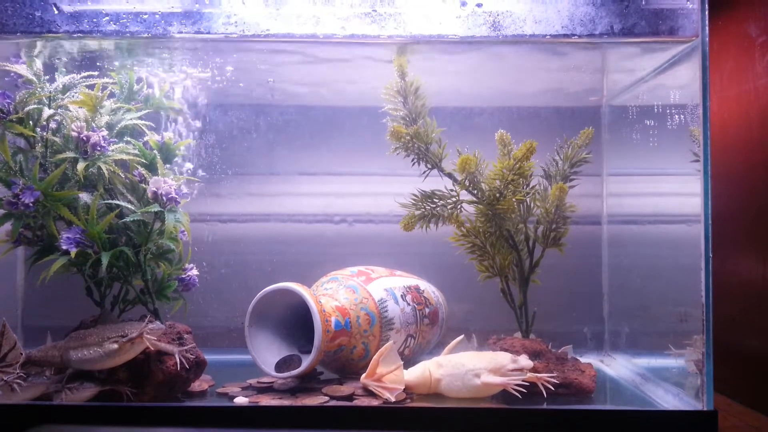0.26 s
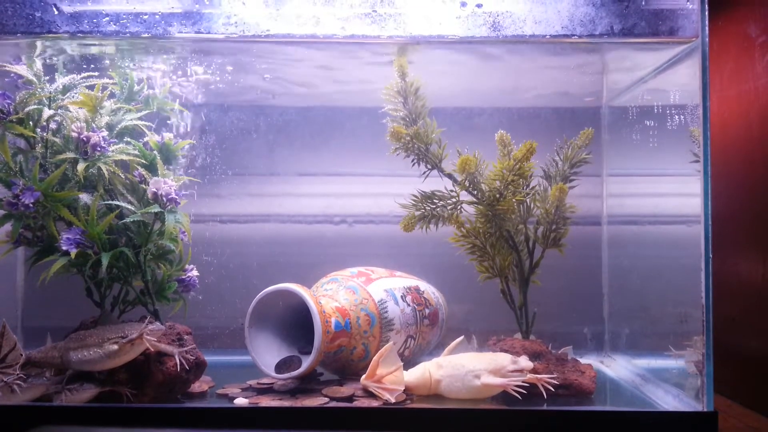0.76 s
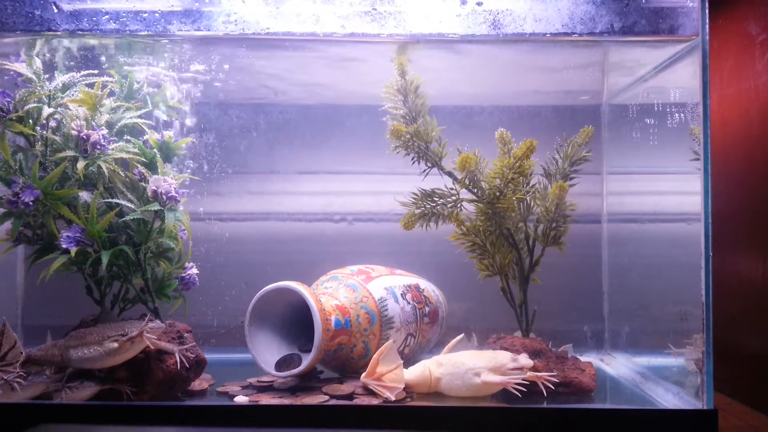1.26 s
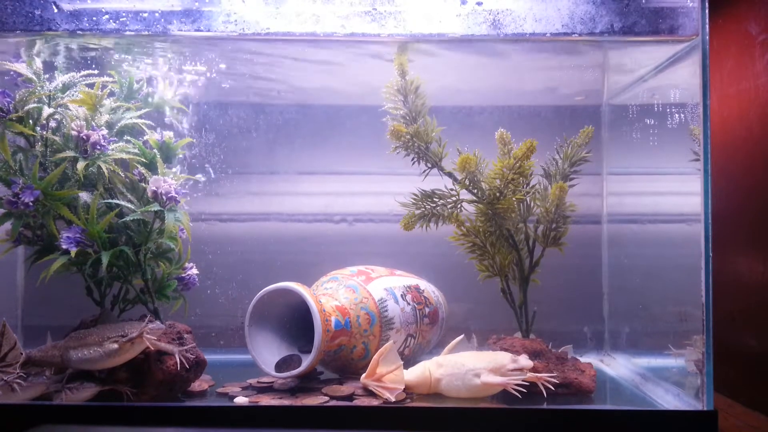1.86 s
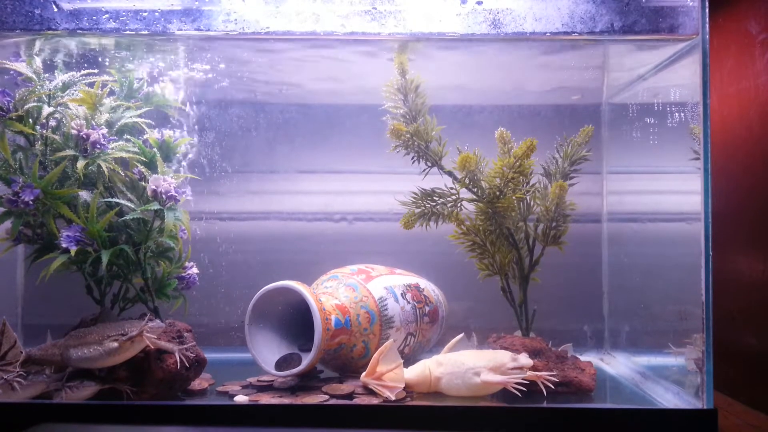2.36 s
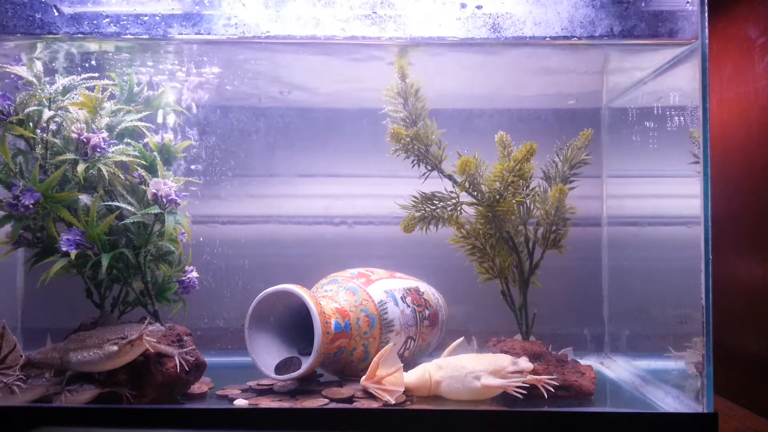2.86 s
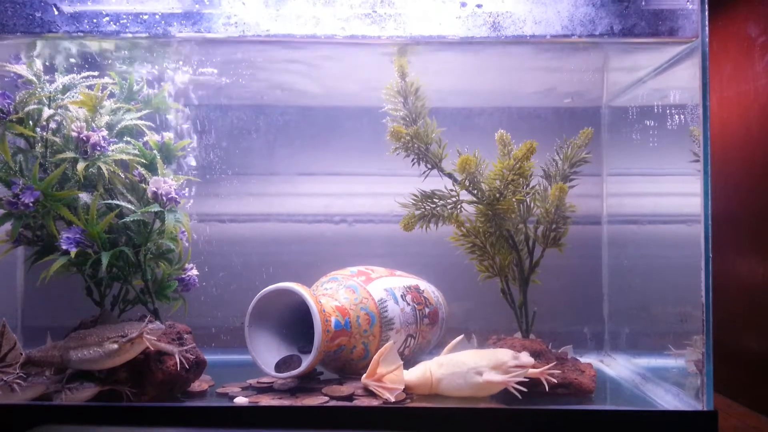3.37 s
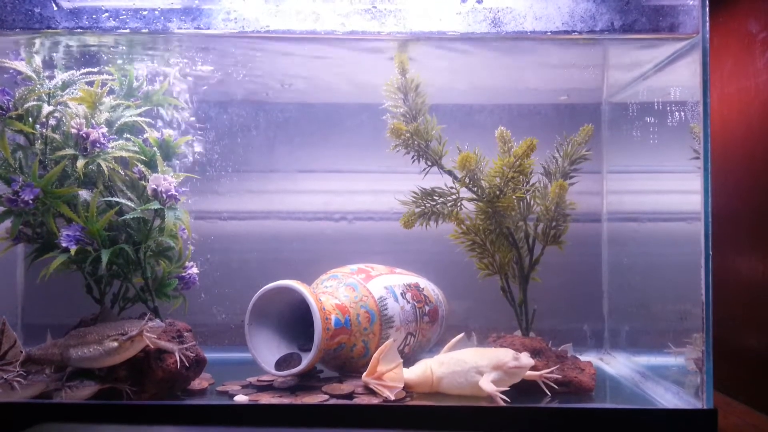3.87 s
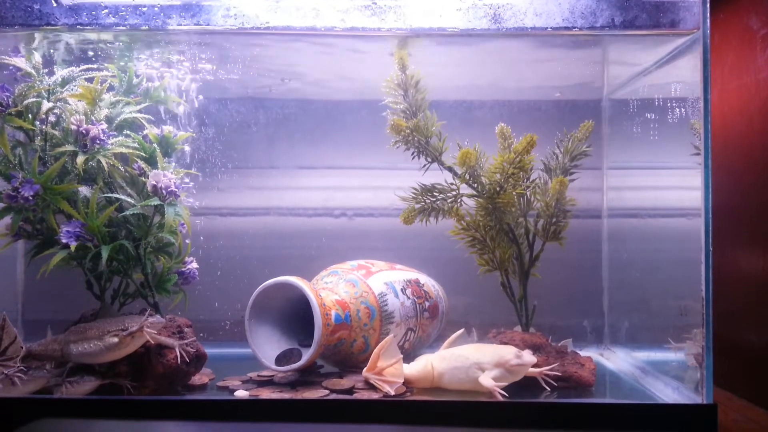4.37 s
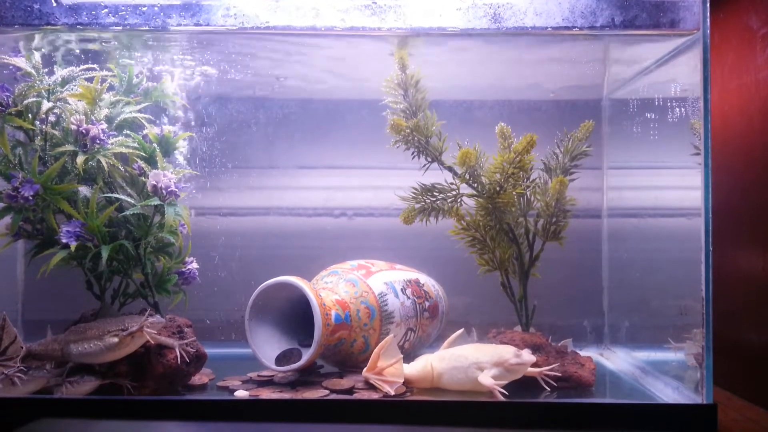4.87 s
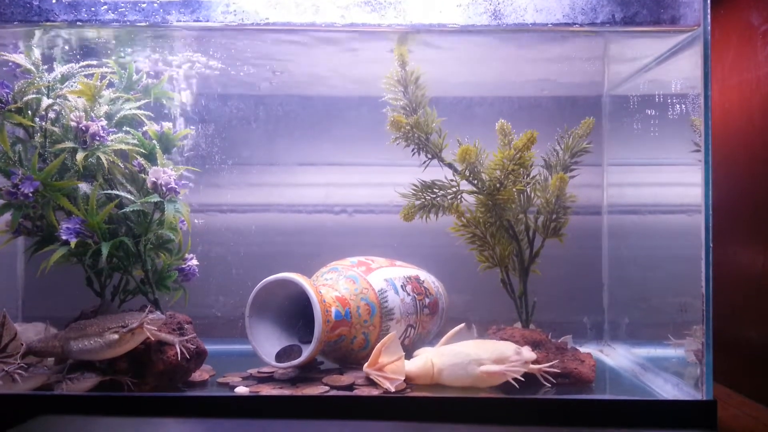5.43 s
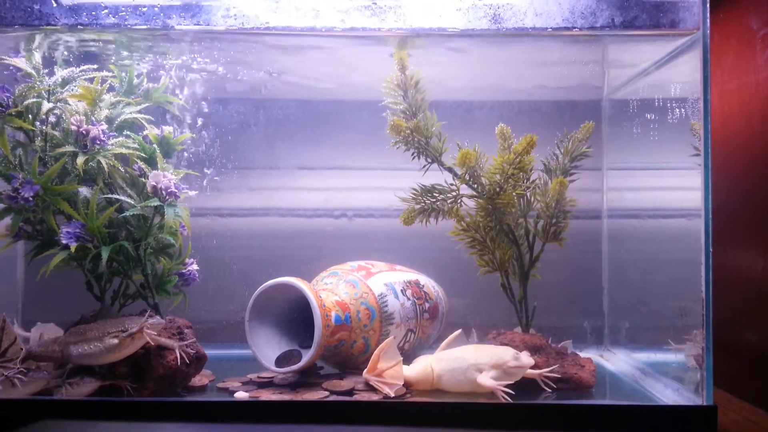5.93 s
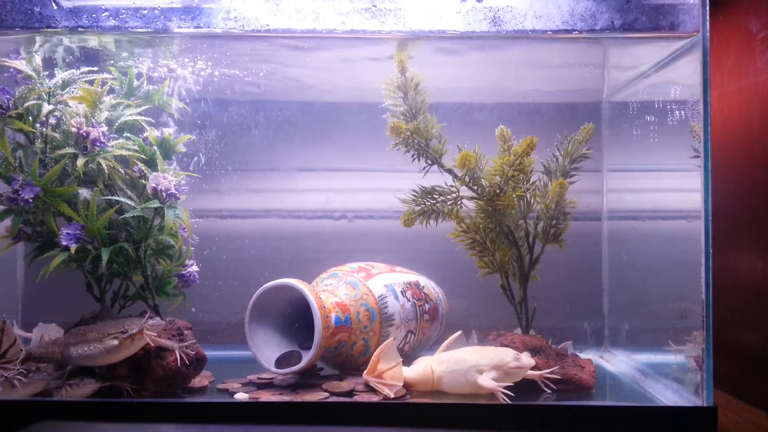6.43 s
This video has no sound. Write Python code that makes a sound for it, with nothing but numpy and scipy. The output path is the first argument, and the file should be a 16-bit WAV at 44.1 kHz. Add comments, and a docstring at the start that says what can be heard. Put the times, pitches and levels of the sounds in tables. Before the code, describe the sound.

Indoor fish tank: bright irregular drips and small bubble plops ring under a hood, over fine trickling and a steady low pump hum.

```python
"""Fish tank in a quiet room

Two microphones, the left one further off, by a tank with a hood. Droplets tick and air pockets plop at the
surface: each is a short ring with a noisy splash. Dry snaps of drops on the rim are close by, over a fine
trickle of tiny bubbles and spray. The water rings on in the hard space under the hood. Behind it a
mains-driven pump hums as a stack of sines, and bubbling rumbles as noise coloured by the tank's walls."""
import sys
import numpy as np
from scipy import signal
from scipy.fft import rfft, irfft
from scipy.io import wavfile
from scipy.ndimage import uniform_filter1d

SR = 44100
rng = np.random.default_rng(int(sys.argv[2]) if len(sys.argv) > 2 else 0)


def dump(signal):
    """Clip the signal to [-1, 1] and save it as 16-bit WAV at the path in sys.argv[1]."""
    limited = np.clip(np.atleast_2d(signal).T, -1, 1)
    pcm = np.round(limited * 32767).astype(np.int16)
    wavfile.write(sys.argv[1], SR, pcm)


N = 295470   # length in samples, 6.7 s
SPOTS = 4   # places on the surface, each with its own reflections
MAINS_HZ = 60.02


def from_db(db):
    """Decibels to an amplitude factor."""
    return 10 ** (np.asarray(db) / 20)


def rms_one(x):
    """Scales a signal to an RMS of 1."""
    return x / np.sqrt(np.mean(x ** 2) + 1e-20)


def at_hz(points, hz):
    """Reads a spectrum table on a log-frequency axis."""
    table = np.array(points)
    return np.interp(np.log(hz + 1e-9), np.log(table[:, 0]), table[:, 1])


def resonances(table, hz):
    """Sums bell-shaped peaks, in dB, from rows of pitch, width and height."""
    return sum(db / (1 + (2 * (hz - centre) / width) ** 2) for centre, width, db in table)


def drift(rate_hz):
    """Slow chance of spread 1: coarse noise through a double one-pole low-pass."""
    step = 40   # samples per coarse point
    pole = np.exp(-2 * np.pi * rate_hz * step / SR)
    noise = rng.standard_normal(N // step + 2002)
    slow = signal.lfilter([1], [1, -2 * pole, pole * pole], noise)[2000:]   # drop the settling
    return np.interp(np.arange(N) / step, np.arange(len(slow)), rms_one(slow))


# how the two microphones differ in colour: pitch_hz, left_minus_right_db
SIDES = [(700, 5.5), (1200, -1.5), (1900, 0.5), (2900, 6.5), (4600, 6.5), (5600, 16.5), (6900, -6.5),
         (8500, -6), (11000, -1.5), (14800, 8.5)]


def sides(hz):
    """Left and right gain at a pitch, the difference shared equally between them."""
    return from_db(at_hz(SIDES, hz) * np.array([[.5], [-.5]]))


def add(out, start_s, wave):
    """Places a stereo sound at one of the spots, chosen by its moment."""
    at = round(start_s * SR)
    end = min(at + wave.shape[1], N)
    out[int(start_s * 100) % SPOTS, :, at:end] += wave[:, :end - at]


def scattered(count, middle, spread):
    """Event rows at random moments, each column drawn around its middle."""
    starts = rng.uniform(0, N / SR, count)
    values = rng.normal(middle, np.abs(spread), (count, len(middle)))
    return [(start_s, *row) for start_s, row in zip(starts, values)]


def bubble(hz, cycles, rise, attack_cycles):
    """An air pocket swells into a ring of a few cycles; its pitch rises as it nears the surface."""
    turns = np.arange(int(cycles * SR / hz) + 2) * hz / SR
    shape = np.exp(-np.log(1000) * turns / cycles)
    shape *= (1 - np.exp(-turns / attack_cycles)) ** 2
    wave = shape * np.sin(2 * np.pi * turns * (1 + rise * (turns / cycles - .3)))
    return wave / np.abs(wave).max()


TEAR_RISE_S, TEAR_T60_S = .002, .024   # a film takes a few ms to break
# hard hits and small bubbles ring shorter: cycles at a middling strength and pitch, loss above them
TICK_CYCLES, TICK_MIDDLE_DB, TICK_MIDDLE_HZ = 25.4, -30, 5800
CYCLES_LOST_PER_DB, CYCLES_LOST_PER_KHZ = 0.8, 4.4
# fainter droplets: middle and spread of ring_level_db, pitch_hz, splash_level_db
FAINT_TICKS, FAINT_TICK, FAINT_TICK_SPREAD = 45, (-49, 6100, -33), (2.5, 1000, 5)
# colour of a breaking film: pitch_hz, level_db
SPLASH = [(180, -52), (530, -2.5), (900, -2.5), (1530, -14), (2030, -4), (4010, -2), (4620, -1.5),
          (5510, -1.5), (7320, 5.5), (9930, -7.5), (13200, -11.5), (15000, -65)]
# clearest droplets on the surface, levels before the path to the microphones:
# start_s, ring_level_db, pitch_hz, splash_level_db
TICKS = [(0.036, -41, 6400, -15), (0.2111, -34, 5700, -5.5), (0.3319, -20.5, 7100, -18),
         (0.3462, -25, 5680, -12), (0.4155, -36, 5360, -35), (0.614, -18, 5380, -12),
         (0.6317, -19, 6850, -30), (0.721, -41, 5800, -16.5), (0.8662, -33.5, 4040, -12.5),
         (0.912, -37, 7020, -30), (0.9494, -25, 10500, -22), (0.983, -37, 6800, -18),
         (1.101, -29, 5350, -39), (1.1136, -19, 7050, -36), (1.2685, -37, 5300, -13),
         (1.3498, -32.5, 5520, -13), (1.4035, -22.5, 6000, -7.5), (1.4934, -28.5, 7230, -23),
         (1.6104, -39, 5650, -14.5), (1.688, -29, 7900, -16.5), (1.7, -37, 5360, -14),
         (1.761, -37, 5100, -20), (1.853, -43, 5450, -21), (1.8819, -24, 5680, -4),
         (1.9455, -45, 5360, -12), (2.1982, -27, 5780, -19), (2.3152, -13, 7100, -14),
         (2.4145, -33, 5230, -22), (2.448, -36, 5690, -35), (2.541, -39, 5700, -22),
         (2.5965, -36, 5270, -18), (2.6345, -46, 7600, -12), (2.6962, -41, 5800, -13),
         (2.7255, -37.5, 5300, -16), (2.767, -23.5, 8040, -18), (2.8468, -36, 5400, -11.5),
         (2.9655, -32, 6060, -11.5), (3.049, -12, 7300, -7), (3.135, -22, 6700, -10.5),
         (3.155, -32, 4430, -27), (3.3637, -34, 6100, -10), (3.484, -33, 7200, -15.5),
         (3.52, -44, 5440, -38), (3.6052, -9.5, 4840, -5), (3.8272, -58, 5700, -15),
         (3.8821, -64, 5750, -15), (3.9864, -33, 5260, -19), (4.115, -60, 5500, -16.5),
         (4.2165, -40, 7550, -13), (4.278, -43, 7800, -24), (4.315, -35.5, 4300, -27),
         (4.3806, -34, 5800, -7.5), (4.443, -34, 7360, -20), (4.503, -38.5, 5500, -18),
         (4.579, -53, 7100, -8.5), (4.6282, -25, 6140, -9), (4.7106, -36, 7040, -9),
         (5.0057, -36, 3960, -15), (5.0284, -25, 4750, -28), (5.035, -17.5, 6400, -17),
         (5.1032, -43, 6000, -17), (5.2355, -29, 6500, -9.5), (5.3202, -25.5, 7540, -21),
         (5.3597, -28.5, 8150, -12), (5.4294, -56, 5500, -11.5), (5.5515, -34.5, 5200, -15.5),
         (5.7045, -38, 4750, -13), (5.8072, -36, 6450, -24), (5.979, -40, 5270, -56),
         (6.075, -30, 7350, -35), (6.098, -23.5, 5800, -13), (6.126, -17.5, 6260, -10),
         (6.1882, -32, 4750, -11), (6.3592, -34, 6560, -17), (6.4438, -34, 6270, -8),
         (6.544, -31.5, 4800, -11), (6.5874, -24.5, 5460, -11), (6.6228, -29, 4140, -24)]


def ticks():
    """A droplet makes a short high bubble ring and a broad splash click, each with a colour of its own."""
    out = np.zeros((SPOTS, 2, N))
    band = np.arange(129) * SR / 256
    knots = np.geomspace(800, 15000, 7)   # Hz, where each splash's own colour varies
    rows = TICKS + scattered(FAINT_TICKS, FAINT_TICK, FAINT_TICK_SPREAD)
    t = np.arange(900) / SR
    crackle = rng.standard_normal((len(rows), len(t))) ** 3   # uneven little ruptures
    tears = crackle * from_db(-60 * t / TEAR_T60_S) * (1 - np.exp(-t / TEAR_RISE_S))
    chances = rng.standard_normal((len(rows), len(knots)))
    for (start_s, ring_db, hz, splash_db), chance, tear in zip(rows, chances, tears):
        lost = CYCLES_LOST_PER_DB * (ring_db - TICK_MIDDLE_DB)
        lost += CYCLES_LOST_PER_KHZ * (hz - TICK_MIDDLE_HZ) / 1000
        ring = bubble(hz, max(TICK_CYCLES - lost, 11), rise=0.12, attack_cycles=2.8)
        add(out, start_s, from_db(ring_db) * sides(hz) * ring)

        colour = at_hz(SPLASH, band) + 2 * at_hz(np.c_[knots, chance], band)
        centred = from_db(colour) * sides(band) * (-1) ** np.arange(129)   # pulse at sample 128
        pulse = irfft(centred) * np.hanning(256)
        splash = signal.convolve(pulse, [tear / np.linalg.norm(tear)])
        add(out, max(start_s - 128 / SR, 0), from_db(splash_db) * splash)
    return out


# ring length at a middling pitch, swell, and share by which the pitch climbs
PLOP_CYCLES, PLOP_SWELL_CYCLES, PLOP_RISE = 30, 1.6, .11
PINCH_DB, PINCH_T60_S = -6, .035   # rough splash as a pocket pinches off, against its ring
# fainter bubbles: middle and spread of level_db, pitch_hz
FAINT_PLOPS, FAINT_PLOP, FAINT_PLOP_SPREAD = 190, (-50.5, 2050), (3, 600)
# clearest larger bubbles, levels before the path to the microphones: start_s, level_db, pitch_hz
PLOPS = [(0.009, -30.5, 814), (0.017, -40, 2050), (0.046, -38, 840), (0.108, -44, 3560),
         (0.1725, -43, 2200), (0.205, -34, 1060), (0.075, -41.5, 850), (0.211, -47, 2780),
         (0.243, -45, 2360), (0.3007, -36, 2820), (0.323, -36, 2920), (0.355, -46, 2610), (0.405, -40, 870),
         (0.402, -38, 4000), (0.47, -45, 2540), (0.52, -42, 1760), (0.5377, -37, 2700), (0.612, -37, 2070),
         (0.6725, -31, 2980), (0.7577, -35.5, 2700), (0.762, -39, 2040), (0.828, -41, 1900),
         (0.87, -42, 1910), (0.8699, -35, 2930), (1.143, -44, 2660), (1.229, -46.5, 2150),
         (1.304, -43.5, 2640), (1.38, -50, 2510), (1.428, -46, 2240), (1.445, -43, 1760),
         (1.456, -38, 1130), (1.54, -50, 3000), (1.5604, -43, 2660), (1.575, -43.5, 1000),
         (1.716, -44.5, 2300), (1.8823, -36.5, 2590), (2.0876, -30, 3590), (2.139, -41.5, 2670),
         (2.287, -46, 2220), (2.3326, -36.5, 2120), (2.5096, -30.5, 3100), (2.593, -39, 2380),
         (2.598, -41.5, 1420), (2.7263, -35.5, 3600), (2.848, -41, 1330), (2.8494, -40.5, 2690),
         (2.972, -35.5, 1150), (2.972, -38, 2950), (3.141, -39, 2470), (3.161, -37.5, 1910),
         (3.252, -38.5, 2560), (3.316, -51, 3020), (3.352, -42, 890), (3.433, -40.5, 2930),
         (3.593, -41, 2630), (3.6067, -32, 1820), (3.645, -39.5, 2450), (3.7155, -30.5, 2420),
         (3.7655, -40, 2440), (3.8135, -36.5, 2200), (3.885, -39.5, 2880), (3.927, -47, 2380),
         (3.991, -38, 750), (3.989, -41.5, 2660), (4.0627, -40, 1930), (4.1, -53, 2700),
         (4.135, -38.5, 1260), (4.2208, -42, 2340), (4.223, -40, 1047), (4.3843, -34, 2840),
         (4.406, -37.5, 2570), (4.581, -38.5, 2800), (4.626, -54, 2590), (4.649, -49, 2170),
         (4.7157, -24.5, 2076), (5.037, -38, 2430), (5.1035, -24, 877), (5.103, -41, 2750),
         (5.158, -36.5, 2670), (5.1687, -35, 3560), (5.204, -34, 2670), (5.325, -48, 2360),
         (5.3462, -34.5, 3080), (5.432, -39, 2920), (5.432, -42, 1820), (5.451, -41, 1760),
         (5.5047, -38, 1880), (5.5525, -33.5, 3030), (5.6985, -31.5, 1030), (5.8441, -50, 2400),
         (5.872, -45, 2670), (5.971, -44, 3070), (6.124, -38.5, 2970), (6.1589, -37.5, 1740),
         (6.1923, -32, 3100), (6.277, -42, 844), (6.3072, -38.5, 2640), (6.36, -34, 3150),
         (6.442, -43, 2380), (6.492, -35.5, 1970), (6.623, -40.5, 1240), (6.623, -39.5, 2800)]


def plops():
    """Larger pockets ring lower and rounder, each opened by a short rough splash around its pitch."""
    out = np.zeros((SPOTS, 2, N))
    t = np.arange(SR // 40) / SR
    rows = PLOPS + scattered(FAINT_PLOPS, FAINT_PLOP, FAINT_PLOP_SPREAD)
    envelope = from_db(-60 * t / PINCH_T60_S) * (1 - np.exp(-t / TEAR_RISE_S))
    noises = rng.standard_normal((len(rows), len(t))) * envelope
    for (start_s, level_db, hz), chance, noise in zip(rows, rng.standard_normal(len(rows)), noises):
        hz = max(hz, SMALL_BUBBLES[0][0] / 2)
        # fewer cycles lower down, and a random spread
        cycles = PLOP_CYCLES * np.cbrt(hz / FAINT_PLOP[1]) * from_db(2 * chance)
        ring = bubble(hz, cycles, PLOP_RISE, PLOP_SWELL_CYCLES)
        add(out, start_s, from_db(level_db) * sides(hz) * ring)

        pinch = signal.lfilter(*signal.butter(2, [.8 * hz, 2 * hz], "band", fs=SR), noise)
        pinch /= np.abs(pinch).max()
        add(out, start_s, from_db(level_db + PINCH_DB) * sides(hz) * pinch)
    return out


SNAP_LOW_HZ, SNAP_HIGH_HZ = 600, 6500
SNAP_HOLD_S, SNAP_T60_S = .005, .012
# dry snaps of drops on the rim, close to the microphones: start_s, level_db (before the air gap's colour)
SNAPS = [(1.662, -32), (2.595, -31), (2.849, -25.5), (3.987, -38), (4.026, -40), (4.22, -31), (4.717, -34),
         (6.623, -29)]


def snaps():
    """A drop on the rim gives a few ms of broad crackle, without echo."""
    out = np.zeros((2, N))
    t = np.arange(SR // 50) / SR
    band = signal.butter(2, [SNAP_LOW_HZ, SNAP_HIGH_HZ], "band", fs=SR, output="sos")
    envelope = from_db(-60 * np.maximum(t - SNAP_HOLD_S, 0) / SNAP_T60_S)
    for (start_s, level_db), noise in zip(SNAPS, rng.standard_normal((len(SNAPS), len(t)))):
        wave = signal.sosfilt(band, noise * envelope)
        out[:, round(start_s * SR):][:, :len(t)] += from_db(level_db) * wave / np.abs(wave).max()
    return out


def swarm(spectrum, level_db, per_s, size_db, cycles, count):
    """Countless small bubbles at random moments, sizes, pitches and spots, in clumps."""
    chance = per_s * from_db(2.5 * drift(12)) / SR   # of a bubble at each sample
    sizes = from_db(size_db * np.minimum(rng.exponential(1, N), 3)) * (rng.random(N) < chance)
    pitches = np.geomspace(spectrum[0][0], spectrum[-1][0], count)
    dealt = rng.integers(0, count, N)   # which pitch each moment gets
    out = np.zeros((SPOTS, 2, N))
    for k, hz in enumerate(pitches):
        level = from_db(at_hz(spectrum, hz)) * hz   # higher bubbles are shorter and spaced wider in pitch
        ring = bubble(hz, cycles, rise=0.66, attack_cycles=0.58)
        rings = signal.oaconvolve(sizes * (dealt == k), ring)[:N]
        out[k % SPOTS] += level * sides(hz) * rings
    return from_db(level_db) * rms_one(out)


# fine trickle between the clear events, levels before the path to the microphones:
# start_s, small_bubbles_db, spray_db
TRICKLE = [(0.0, -59, -63.5), (0.76, -67.5, -58), (0.95, -67, -59), (2.82, -64.5, -62.5),
           (3.51, -63, -62.5), (5.06, -67.5, -64), (5.26, -64, -60.5), (5.82, -69.5, -62.5),
           (6.29, -58.5, -57.5), (6.7, -85, -60.5)]
# colour of the small bubbles: pitch_hz, level_db (per Hz)
SMALL_BUBBLES = [(850, 9), (1100, 4.5), (1500, -1.5), (1950, -5), (2300, -3.5), (2800, -6.5), (3300, 6.5),
                 (4000, -9.5)]
# colour of the spray: pitch_hz, level_db (per Hz)
SPRAY = [(2240, -29), (3800, 5.5), (4120, -15.5), (5510, 10.5), (6080, -15), (7280, 4), (9950, -11.5),
         (13100, -5.5), (14600, -10), (14900, -42), (15200, -55)]


def trickle():
    """Small bubbles and a denser, higher spray, each a swarm of tiny rings whose level glides."""
    start_s, small_db, spray_db = np.transpose(TRICKLE)
    t = np.arange(N) / SR
    small_level = np.interp(t, start_s, small_db)
    spray_level = np.interp(t, start_s, spray_db)
    small = swarm(SMALL_BUBBLES, small_level, per_s=500, size_db=7.0, cycles=24.0, count=32)
    spray = swarm(SPRAY, spray_level, per_s=1100, size_db=5.5, cycles=20.4, count=24)
    return small, spray


def direct(x, level_db):
    """The straight path, reaching the further, left microphone later."""
    lag_s = 0.00045
    left, right = x.sum(axis=0)
    at = np.arange(N)
    return from_db(level_db) * np.array([np.interp(at - lag_s * SR, at, left), right])


TAIL_T60_S, EARLY_T60_S, EARLY_DB = 0.18, 0.045, -7.
ECHO_DB, ECHO_RISE_S = -23.5, .002   # reflections build up after the straight sound
HOOD_DB = -20   # air modes against the noisy tail
# air modes under the hood: pitch_hz
HOOD_HZ = [1100, 2020, 2240, 2560, 2790, 2980, 4580, 5370, 5470, 5690, 7060, 7300]


def hood(x, echo_db):
    """Reflections, stronger early on, thin into a dense dying tail mixed with ringing air modes."""
    t = np.arange(SR // 2) / SR
    early = from_db(EARLY_DB - 60 * t / EARLY_T60_S)
    echo = rng.standard_normal((SPOTS, 2, len(t))) * (1 + early)
    # reflections arrive in bunches a few ms long
    lumps = uniform_filter1d(rng.standard_normal(echo.shape), size=120, axis=2)
    echo *= from_db(2 * rms_one(lumps))
    for hz in HOOD_HZ:
        phase = rng.random((SPOTS, 2, 1))
        echo += from_db(HOOD_DB) * np.sin(2 * np.pi * (hz * t + phase))
    echo *= from_db(echo_db - 60 * t / TAIL_T60_S) * (1 - np.exp(-t / ECHO_RISE_S))
    # the last tail wraps round, so the hood already rings when listening starts
    return irfft((rfft(x) * rfft(echo, N)).sum(axis=0), N)


# broad resonances of the air gap above the water: pitch_hz, width_hz, level_db
GAP = [(2300, 83, 3.5), (4160, 240, -4), (2590, 74, 6.5), (2814, 95, 3.5), (4670, 250, 4), (5230, 150, 5.5),
       (5650, 130, 6.5), (6500, 220, 3.5), (7200, 330, 2.5), (7870, 370, 3.5)]


def cavity(x):
    """The air gap colours every water sound at the same few pitches."""
    hz = np.arange(N // 2 + 1) * SR / N
    return irfft(rfft(x) * from_db(resonances(GAP, hz) - 2.5), N)


HUM_LAG_S = 0.00033   # the right channel is later
# pump hum: mains_multiple, left_level_db, right_level_db (RMS)
HUM = [(1, -77, -79), (2, -63, -59.5), (3, -38, -36), (4, -75, -61), (5, -49, -49), (6, -65.5, -63),
       (8, -94, -58.5), (12, -65.5, -80)]


def hum():
    """The pump's armature shakes the tank at multiples of the mains, wavering a little with the load."""
    t = np.arange(N) / SR - np.array([[0], [HUM_LAG_S]])
    out = np.zeros((2, N))
    for multiple, left_db, right_db in HUM:
        level = np.sqrt(2) * from_db(np.array([[left_db], [right_db]]) + 0.29 * drift(30))
        out += level * np.sin(2 * np.pi * (multiple * MAINS_HZ * t + rng.random()))
    return out


RUMBLE_DB, STROKE_DB = -46.5, 2   # middle level; swing with each stroke of the pump
# colour of the bubbling noise: pitch_hz, level_db (per Hz)
RUMBLE = [(20, -29), (60, -19.5), (110, -14.5), (205, -3.5), (232, -28), (260, -6), (320, -12.5),
          (410, -20.5), (650, -20.5), (1000, -30), (1600, -34)]
# tank wall resonances: pitch_hz, width_hz, level_db
WALLS = [(282.5, 25.7, 15.5), (368, 54, 13), (477, 41, 13.5), (580.5, 81, 16.5), (817, 126, 13.5)]
# likeness of the left and right channels: pitch_hz, likeness (0 to 1)
LIKENESS = [(30, 0.24), (130, 0.75), (290, 1), (640, 0.54), (1400, 0.28)]


def rumble():
    """Bubbling noise coloured by the tank walls, most alike in both channels near 290 Hz."""
    hz = np.arange(N // 2 + 1) * SR / N
    gain = from_db(at_hz(RUMBLE, hz) + resonances(WALLS, hz)) * (hz < RUMBLE[-1][0])
    alike = np.clip(at_hz(LIKENESS, hz), 0, 1)
    mid, side = rfft(rng.standard_normal((2, N)))
    noise = irfft(gain * (np.sqrt(1 + alike) * mid + np.sqrt(1 - alike) * side * [[1], [-1]]), N)
    stroke_db = STROKE_DB * np.sin(2 * np.pi * MAINS_HZ * np.arange(N) / SR)
    return from_db(RUMBLE_DB + 1.03 * drift(35) + stroke_db) * rms_one(noise)


def scene():
    """Water sounds but the snaps share the hood's reverberation; hum and rumble come through the tank."""
    small, spray = trickle()
    high = spray + ticks()
    low = small + plops()
    near = direct(high, level_db=2.5) + direct(low, level_db=5.) + snaps()
    water = cavity(near + hood(high + low, echo_db=ECHO_DB))
    return water + hum() + rumble()


def record(dry):
    """A steep low-pass cuts the top, 50 dB down from 15.1 kHz."""
    return signal.sosfilt(signal.cheby2(14, 50, 15100, fs=SR, output="sos"), dry)


dry = scene()
out = record(dry)
dump(out)
```